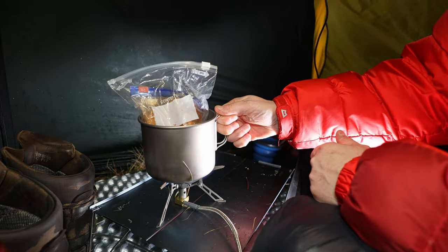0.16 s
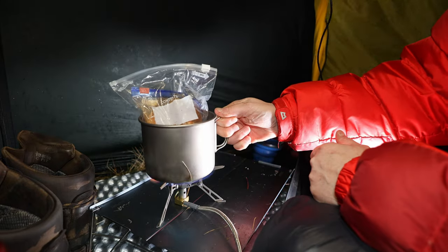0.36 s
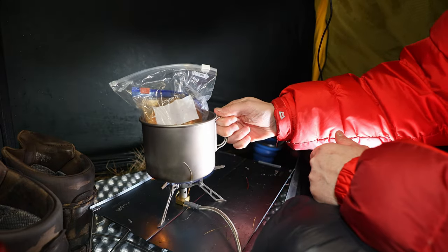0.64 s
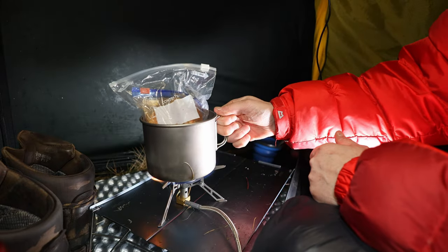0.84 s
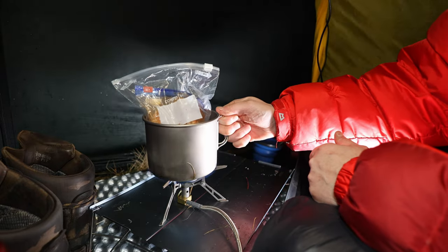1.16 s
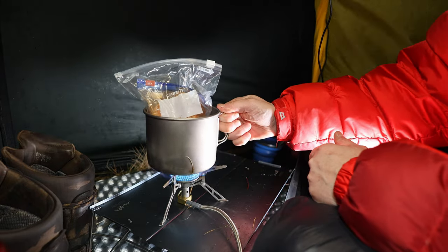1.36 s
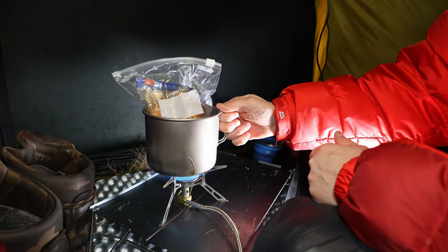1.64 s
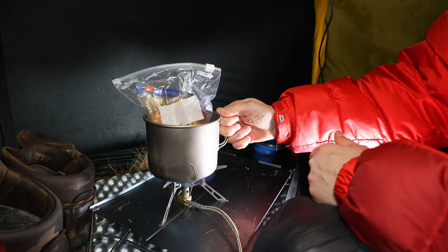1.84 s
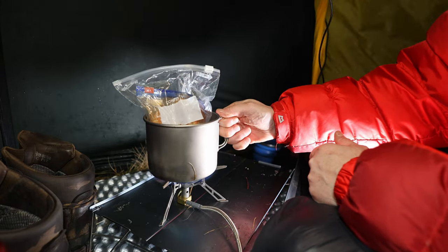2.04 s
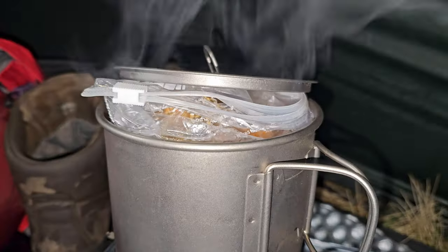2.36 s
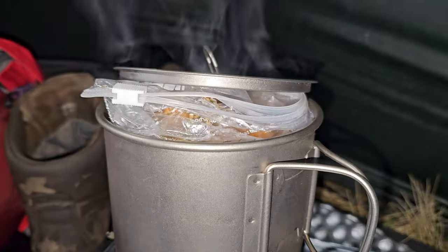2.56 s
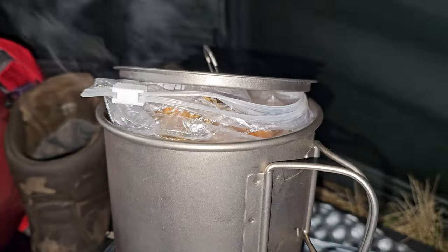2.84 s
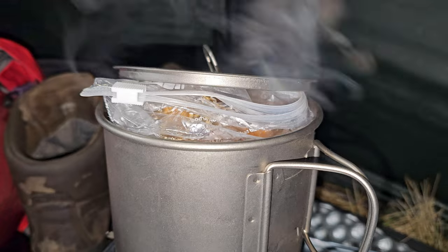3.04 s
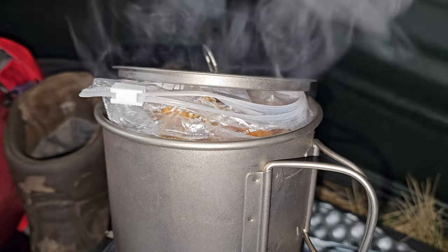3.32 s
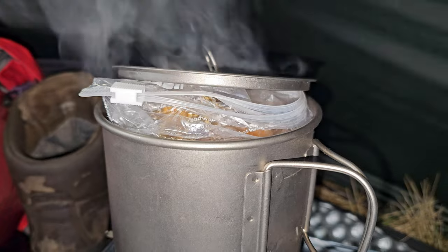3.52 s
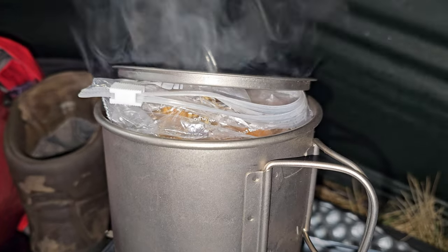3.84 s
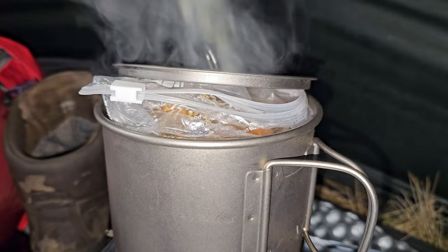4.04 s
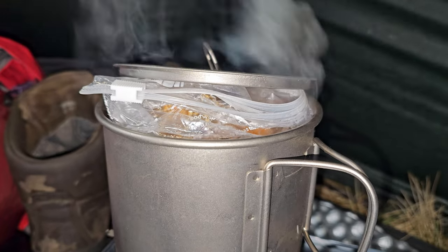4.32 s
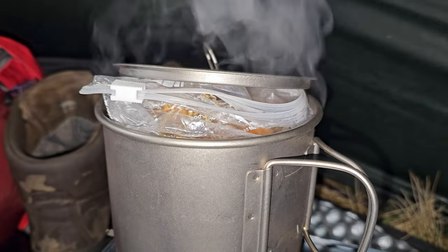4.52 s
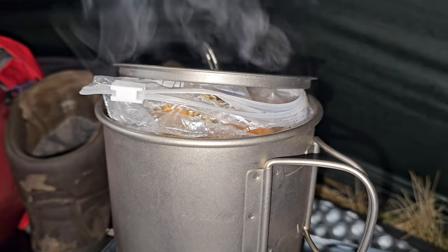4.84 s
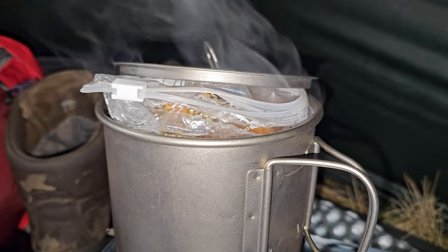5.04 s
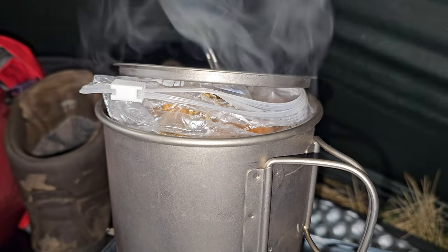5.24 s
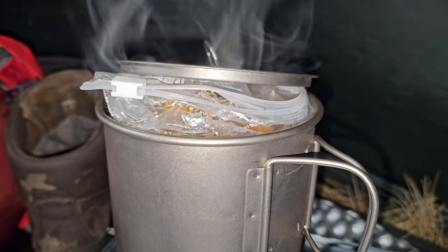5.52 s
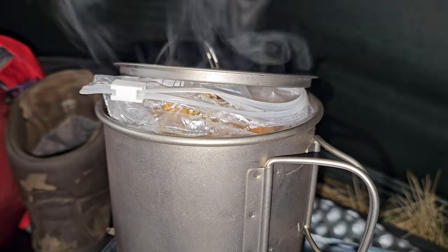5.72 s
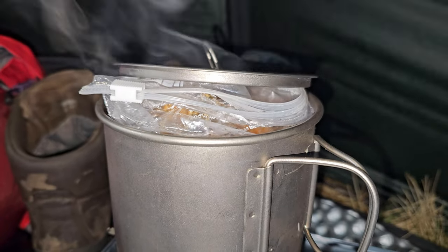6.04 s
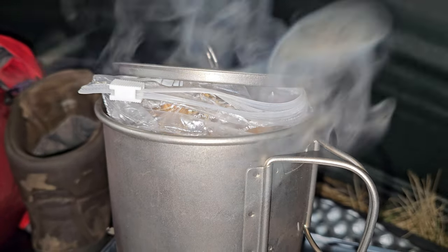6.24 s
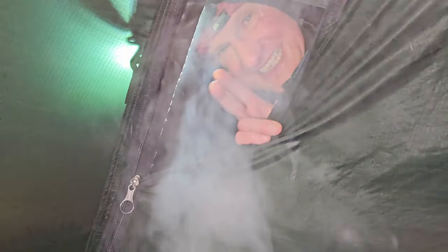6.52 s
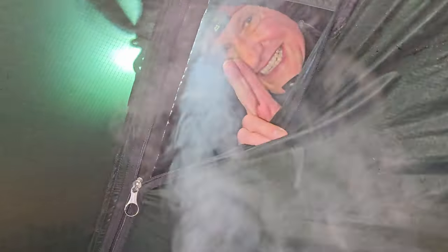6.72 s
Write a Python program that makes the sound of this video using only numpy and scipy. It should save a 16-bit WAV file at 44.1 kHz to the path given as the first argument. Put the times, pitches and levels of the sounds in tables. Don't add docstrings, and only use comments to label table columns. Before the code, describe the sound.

Inside a tent, a small gas burner hisses close and mono, with sleeve rustles, a dull arm brush and two sharp crackles. Around two seconds the sound cross-fades to a wide stereo view: heavy low wind billows, cloth flaps and cracks, walls slam taut, the lid tinkles and droplets ping over a fainter hiss. After a tiny dropout, a final gusty stretch follows with a dull knock.

```python
import sys
import numpy as np
from scipy import signal
from scipy.fft import rfft, irfft, next_fast_len
from scipy.io import wavfile
from scipy.ndimage import uniform_filter1d, map_coordinates

SR = 44100
rng = np.random.default_rng(int(sys.argv[2]) if len(sys.argv) > 2 else 0)


def decibels_to_gain(level_db):
    exponent = np.asarray(level_db, float) / 20
    return 10 ** exponent


def wav_out(sig):
    wavfile.write(sys.argv[1], SR, np.round(np.clip(np.atleast_2d(sig).T, -1, 1) * 32767).astype(np.int16))


N = 303393

FADE_START, FADE_END = 1.944, 2.73
DROPOUT_START, DROPOUT_END = 6.358, 6.3915

# (frequency [Hz], density [dB per Hz])
WIND_TONE_NEAR = [(12, -38), (20, 1), (80, -2.5), (108, -1), (159, -2.5), (251, -2.5), (738, -19.5),
                  (1300, -25.5), (2180, -12.5), (2480, -19), (3500, -41), (4550, -52), (7700, -120)]
WIND_TONE_FAR = [(12, -36), (20, -10), (49, 2), (91, -0.5), (386, -20.5), (841, -20), (1020, -25.5),
                 (1680, -26), (2480, -41), (3500, -42.5), (4550, -52), (7700, -120)]
# (time [s], strength [dB])
WIND_NEAR = [(0, -49), (0.6, -40.5), (1.3, -38), (1.9, -36.5), (2.7, -32.5)]
WIND_FAR = [(2.0, -33), (2.6, -27.5), (2.9, -28.5), (3.3, -28), (3.8, -29), (4.5, -34.5), (5.3, -31),
            (5.8, -28), (6.35, -29.5), (6.42, -36), (6.65, -27), (6.88, -32)]
# (peak time [s], peak level [dB], time to fall 10 dB [s])
BILLOWS = [(2.238, -27.5, 0.152), (2.408, -22.6, 0.112), (2.681, -15.8, 0.099), (2.765, -15.5, 0.082),
           (2.889, -15.5, 0.155), (3.145, -20.7, 0.108), (3.402, -22.3, 0.053), (3.485, -17.1, 0.036),
           (3.611, -20.8, 0.123), (3.989, -23.5, 0.121), (4.322, -21.9, 0.073), (4.54, -30.9, 0.049),
           (4.695, -25.3, 0.115), (4.955, -26.4, 0.06), (5.086, -22.3, 0.038), (5.204, -25.1, 0.137),
           (5.437, -22.1, 0.149), (5.506, -21.0, 0.061), (5.616, -13.5, 0.032), (5.688, -16.1, 0.044),
           (5.814, -15.8, 0.18), (6.024, -24.4, 0.09), (6.283, -25.8, 0.044), (6.622, -21.7, 0.119),
           (6.818, -25.8, 0.037)]
# (peak time [s], peak level [dB], time to fall 10 dB [s])
FLAPS = [(1.287, -30.0, 0.052), (1.581, -27.6, 0.043), (1.972, -23.5, 0.035), (2.408, -31.0, 0.126),
         (2.693, -19.1, 0.119), (2.745, -23.3, 0.009), (2.856, -21.7, 0.092), (2.926, -21, 0.07),
         (3.0, -22.5, 0.06), (3.12, -21.5, 0.054), (3.155, -24, 0.03), (3.195, -24.6, 0.008),
         (3.439, -25.1, 0.176), (3.533, -28.1, 0.054), (3.586, -29.6, 0.047), (3.955, -23.5, 0.04),
         (4.312, -32.7, 0.159), (4.584, -30.9, 0.054), (4.66, -32.6, 0.085), (4.988, -27.4, 0.074),
         (5.079, -27.5, 0.056), (5.137, -27.8, 0.066), (5.37, -28.4, 0.022), (5.49, -27.0, 0.124),
         (5.605, -18.5, 0.072), (5.684, -18.7, 0.1), (5.755, -23, 0.06), (5.809, -19, 0.101),
         (5.86, -23, 0.05), (5.895, -20.7, 0.06), (5.94, -24, 0.03), (6.005, -25.2, 0.056),
         (6.186, -36.8, 0.05), (6.618, -35.6, 0.057)]
# (time [s], peak level [dB], pitch [Hz])
SLAMS = [
    (2.659, -15, 66),
    (3.394, -9, 69.6),
    (3.481, -5, 87),
    (5.606, -4, 74.4),
]
# (time [s], peak level [dB], top frequency [Hz], left-right difference [dB])
WHIPS = [(1.964, -20, 4000, -1), (1.977, -17, 5500, -1), (2.018, -22, 3600, -2), (2.707, -19.5, 4500, -7),
         (2.798, -27, 3200, 2), (2.864, -25, 2500, 0), (2.998, -21, 2000, 0), (3.048, -23, 2300, 2),
         (3.196, -24.5, 2400, 0), (3.3011, -24, 1800, 4), (3.4544, -27, 2600, 0), (3.479, -16, 4170, -1),
         (3.6864, -27, 2600, 2.5), (3.9499, -24, 3300, 0), (4.001, -26, 2500, 3), (5.5915, -21, 3500, 1),
         (5.609, -19, 3800, 3.5), (5.6902, -18, 7000, -7), (5.7861, -22, 2600, 3.5),
         (5.815, -16.5, 4000, 2.5), (5.9121, -21, 9000, 2), (5.939, -21, 3600, 0), (6.0198, -23, 8000, -2)]

# (frequency [Hz], ratio [dB])
SPREAD = [(25, -32), (100, -34), (250, -13.5), (640, -3.5), (1400, -13.5), (3000, 0.5), (7000, -4),
          (15000, -0.5)]
# (frequency [Hz], level difference [dB])
TILT = [(60, 0.5), (110, 0.64), (200, 2.2), (380, 2.7), (700, 2.4), (1290, 5), (2380, 2.8), (4400, 0.28),
        (8120, 7), (15000, 1.8)]
# (frequency [Hz], phase lead [rad])
LEAD = [(20, -0.5), (100, 0.31), (300, -0.93), (860, 0.88), (1550, 2), (3000, 3), (5000, 13), (7240, 20),
        (16000, 23)]

# (time [s], peak level [dB], centre [Hz], left-right difference [dB])
KNOCKS = [(0.5162, -20, 1280, 0), (1.8303, -13.5, 1080, 0), (1.8325, -16, 1250, 0),
          (1.9639, -26, 1230, -0.5), (1.9774, -22, 1038, -1), (2.4249, -19, 1080, 1),
          (2.5895, -15, 1080, 2), (2.6924, -7.5, 930, -5), (2.8629, -15, 1010, -10),
          (2.9991, -28, 1290, -3), (3.048, -23, 1020, 0), (3.1961, -32, 1660, 1), (3.3009, -18, 1300, 8),
          (3.437, -39, 1200, -1), (3.48, -20, 1150, -2), (3.9489, -23, 1190, 5), (3.958, -17, 710, 1),
          (4.9861, -18, 1110, 8), (5.218, -22, 1590, 5), (5.4735, -20, 1160, 3), (5.5907, -26, 1100, 8),
          (5.6077, -13, 1160, 5), (5.6914, -20, 1180, -4), (5.7857, -14, 1170, 0), (5.8114, -16, 1090, 3.5),
          (6.485, -16.5, 470, -2), (6.775, -22.5, 1490, 3)]
# (time [s], peak level [dB], centre [Hz], left-right difference [dB])
TICKS = [(1.5369, -20, 2116, 0), (1.9627, -18, 3030, 0), (1.9759, -17, 4200, -2), (2.0188, -17, 2020, -0.5),
         (2.4648, -21, 2670, -2), (2.6828, -21, 2960, -3), (2.7067, -28, 2080, -7), (3.458, -26, 3660, 0),
         (3.481, -28, 1900, 5), (3.695, -25.5, 2040, 0.5), (3.9544, -32, 2730, 1.5),
         (5.6144, -15.5, 1900, -3), (6.0197, -18.5, 2300, -7), (6.1315, -23.5, 2940, -1)]
# (time [s], peak level [dB], centre [Hz], left-right difference [dB])
BRUSH = [
    (.398, -17.5, 630, 0),
]
# (time [s], peak level [dB], pitch [Hz], length [s])
DRIPS = [(3.187, -29, 14100, .011), (4.186, -33, 1500, .004), (4.194, -33, 1400, .004),
         (4.235, -33, 1350, .004), (4.353, -33, 1500, .004), (4.4576, -33, 1650, .004),
         (4.563, -33, 1400, .004), (4.6202, -36, 2500, .003), (4.697, -35, 2000, .003),
         (4.7634, -36, 2500, .003), (4.782, -35, 1600, .004), (4.8981, -33, 1620, .004),
         (5.0687, -32, 1400, .004), (6.064, -42, 6400, .02), (6.267, -38, 5500, .005),
         (6.329, -42, 3800, .005), (6.709, -33, 1500, .004), (6.765, -35, 1400, .004)]
# (time [s], peak level [dB], level under 4 kHz [dB], left-right
# difference [dB])
RUSTLES = [(0.168, -24.5, 7, 0), (0.2634, -29.5, 5, 0), (1.904, -21.5, 5.5, 0), (2.4655, -33.5, 11.5, -1),
           (2.775, -27, -13, 3.5), (3.025, -33, -9, 2.5), (3.696, -34, 2, 3), (3.7994, -34, -15, 5.5),
           (3.896, -38, -9, 6), (4.1704, -35.5, 6, 7), (4.534, -33, 6.5, 6), (4.949, -35.5, 2, 3.5),
           (4.9933, -35, 7.5, 1), (5.3216, -40, 11, 7), (5.4595, -36, 8, 0), (5.5918, -35, 4, -2),
           (5.689, -31, -3, -7), (5.899, -33, 4, -6), (5.912, -28, 4, -1), (6.21, -30, 5, 1),
           (6.27, -32, 4.5, 4), (6.4006, -28, -3.5, 2.5), (6.4174, -40, -15, 2.5), (6.4344, -35, -14, 3.5),
           (.4256, -29, 12, 0),
    (.441, -33, 12, 0),
]
# (time [s], peak level [dB], left-right difference [dB])
LID_TAPS = [(2.6978, -40, 2), (2.7244, -37, 1), (2.7867, -28.5, 5), (2.8794, -36, -2), (3.054, -36, -3),
            (3.181, -23, 0), (3.5239, -40, 4), (5.673, -33, -5), (5.8072, -23.5, -1.5), (5.9494, -35, 2),
            (6.1504, -35, 9)]
# (frequency [Hz], width [Hz], level [dB])
RIM = [(11500, 270, 0), (11600, 300, -8)]
# (frequency [Hz], width [Hz], level [dB])
DOME = [(10900, 600, -2), (14150, 250, 4), (15150, 350, -2), (12200, 400, -16), (8500, 200, -12)]

# (time [s], burst level [dB], length [s], echo level [dB], echo decay by 60 dB [s])
CRACKLES = [
    (.4474, -19, .0026, -9, .06),
    (.5708, -17.5, .0026, -7, .05),
]
# (time [s], peak level [dB])
SPIKES = [(.4475, -9), (.4479, -4), (.4489, -7), (.4495, -7.5), (.571, -5), (.5713, -7), (.5726, -6),
          (.5729, -6.5)]
# (frequency [Hz], density [dB per Hz])
SPARK_TONE = [(470, -20), (1200, -10), (2200, -10), (3200, -3), (5440, -1.5), (9000, 0), (14500, -1),
              (16000, -20)]

# (frequency [Hz], density [dB per Hz])
HISS_NEAR = [(1200, -42), (2000, -29.5), (3650, -14), (4400, -7), (5700, -13.5), (8000, -10), (9000, -15),
             (10200, -23), (12500, -22), (16000, -19)]
HISS_FAR = [(1200, -36), (2000, 7.5), (3000, -1), (4300, -2.5), (5900, -2.5), (8000, -4.5), (10500, -11),
            (14800, -8), (16000, -9.5)]
HISS_LAST = [(1180, -32), (2000, -4), (3170, -12.5), (3810, -14), (6470, -13), (7770, -5), (11400, -15.5),
             (16000, -9)]
# (frequency [Hz], width [Hz], lift [dB])
HEAD_NEAR = [(1900, 190, -12), (2200, 160, -1.5), (2500, 190, -8), (3240, 180, 6.5), (3630, 170, -9),
             (4280, 570, 8.5), (5300, 280, 5), (5950, 270, 8.5), (6700, 170, 6), (6850, 130, -3),
             (7850, 200, 5), (8450, 200, 2), (10300, 300, -2), (10900, 350, 9)]
HEAD_SHIFTED = [(3200, 200, 1), (3600, 200, -5), (4430, 450, 5), (4470, 160, 4), (5250, 230, 2),
                (5950, 200, 7.5), (6400, 250, 5.5), (6800, 130, 4), (7200, 280, 8.5), (7650, 150, 8),
                (7900, 120, -2), (8180, 180, 6), (10300, 300, 2), (10900, 400, 9.5)]
HEAD_FAR = [(5050, 480, 5.6), (7230, 400, 9.2), (9140, 890, 2), (11800, 510, 5.6)]
# (time [s], share moved [0-1])
POT_SHIFT = [(0, 0), (.8, 0.2), (1, .6), (1.6, 0.7), (1.8, 1), (2.6, 0.7)]
# (time [s], level [dB])
GAS_FLOW = [(0, -1.5), (.4, -0.5), (.65, 0.2), (1.25, 0), (1.6, -2), (1.9, 1.4), (2.3, 0.5)]
# (whistle [dB], hiss [dB], air [dB])
JET_NEAR_DB = (-35, -37, -51.5)
JET_FAR_DB = (-48, -47.5, -54)
JET_LAST_DB = (-51.5, -55, -55)
# (whistle [dB per dB], hiss [dB per dB], air [dB per dB])
STIRRED = (0.2, 0.025, 0.41)

CALM_NEAR_DB, CALM_FAR_DB = -40, -30
# (level [dB], growth [dB per dB])
ROAR_NEAR, CLATTER_NEAR = (-32.5, 0.34), (-42, 0.95)
ROAR_FAR, CLATTER_FAR = (-33, 2.1), (-44.5, 0.72)


def unit(x):
    return x / np.sqrt(np.mean(x ** 2) + 1e-20)


def along(points, hz):
    f, v = np.transpose(points)
    return np.interp(np.log(hz + 1), np.log(f + 1), v)


def curve(rows):
    s, values = np.transpose(rows)
    return np.interp(np.arange(N) / SR, s, values)


def wobble(rate):
    knots = rng.standard_normal(int(N * rate / SR) + 4)
    return map_coordinates(knots, [np.arange(N) * rate / SR])


def filtered(x, response):
    n = x.shape[-1]
    m = next_fast_len(n + 4096)
    return irfft(rfft(x, m) * response(np.fft.rfftfreq(m, 1 / SR)), m)[..., :n]


def band(hz, lo_hz, hi_hz):
    return 1 / np.sqrt((1 + (lo_hz / (hz + 1)) ** 8) * (1 + (hz / hi_hz) ** 8))


def lift(modes, hz):
    return decibels_to_gain(sum(db * np.exp(-2 * ((hz - c) / w) ** 2) for c, w, db in modes))


def patches(shape, bins, frames):
    smooth = uniform_filter1d(rng.standard_normal(shape), size=bins, axis=0)
    return unit(uniform_filter1d(smooth, size=frames, axis=1))


def rush(colour, patchy_db, stereo, banded_db=0):
    z = signal.stft(rng.standard_normal((2, N)), nperseg=512)[2]
    eddies = patches(z.shape[1:], 6, 8)
    bands = patches(z.shape[1:], 3, 70)
    pair = signal.istft(z * decibels_to_gain(patchy_db * eddies + banded_db * bands), nperseg=512)[1][:, :N]

    def shared_and_apart(hz):
        turn = stereo * np.arctan(decibels_to_gain(along(SPREAD, hz)))
        return colour(hz) * np.array([np.cos(turn), np.sin(turn)])

    half = np.array([[.5], [-.5]]) * stereo

    def ear_offset(hz):
        return decibels_to_gain(half * along(TILT, hz)) * np.exp(1j * half * along(LEAD, hz))

    mid, side = filtered(pair, shared_and_apart)
    ears = filtered(np.array([mid + side, mid - side]), ear_offset)
    return ears / np.sqrt(np.mean(ears.mean(axis=0) ** 2))


def view_shares():
    far = np.clip((np.arange(N) / SR - FADE_START) / (FADE_END - FADE_START), 0, 1)
    return 1 - far, far


def add(track, s, sound, pan_db):
    spot = track[:, round(s * SR):][:, :sound.shape[-1]]
    spot += (sound * decibels_to_gain([[pan_db / 2], [-pan_db / 2]]))[:, :spot.shape[1]]


def puff(s, t60, colour, attack):
    t = np.arange(SR // 6) / SR
    noise = rng.standard_normal((2, len(t)))
    if s <= (FADE_START + FADE_END) / 2:
        noise = noise[[0, 0]]
    burst = filtered(noise, colour) * decibels_to_gain(-60 * t / max(t60, .005)) * (1 - np.exp(-t / attack))
    return burst / np.abs(burst.mean(axis=0)).max()


def swells(rows, rise):
    t = np.arange(0, N + 64, 64) / SR
    s, db, fall_s = np.transpose(rows)
    after = (t[:, None] - s) / fall_s
    power = decibels_to_gain(db - 10 * np.maximum(after, -after / rise)) ** 2
    return np.interp(np.arange(N) / SR, t, np.sum(power, axis=1))


def gusts():
    booms = decibels_to_gain(2 * 0.2) * swells(BILLOWS, rise=1)
    flaps = decibels_to_gain(2 * 1.75) * swells(FLAPS, rise=.28)
    events = [booms, flaps, flaps * decibels_to_gain(-10.5) ** 2]
    views = [(WIND_NEAR, CALM_NEAR_DB, ROAR_NEAR, CLATTER_NEAR),
             (WIND_FAR, CALM_FAR_DB, ROAR_FAR, CLATTER_FAR)]
    gains = []
    for strength, calm_db, roar, clatter in views:
        above_calm = curve(strength) - calm_db
        layers = zip([(calm_db, 1), roar, clatter], events)
        gains.append([np.sqrt(decibels_to_gain(db + grows * above_calm) ** 2 + power) for (db, grows), power in layers])
    return gains


def evened(x, span, depth):
    power = uniform_filter1d(x.mean(axis=0) ** 2, size=round(span * SR))
    return x / (np.abs(power) + 0.012) ** (np.clip(depth, 0, 1) / 2)


def wind():
    near, far = view_shares()
    lumps = 0.83 * wobble(24) + 0.88 * wobble(70)
    out = 0
    # (low [Hz], near top [Hz], far top [Hz], lumps [dB], patches [dB], evenness [0-1])
    layers = [(20, 128, 146, 0.45, 0.7, 0.59),
              (144.6, 490, 515, 0.92, 2.06, 0.6),
              (532, 1230, 5500, 1.66, 1.84, 1.0)]
    for near_gain, far_gain, layer in zip(*gusts(), layers):
        lo_hz, near_hz, far_hz, lump_db, patchy_db, depth = layer
        close = rush(lambda hz: decibels_to_gain(along(WIND_TONE_NEAR, hz)) * band(hz, lo_hz, near_hz), patchy_db, stereo=0)
        tent = rush(lambda hz: decibels_to_gain(along(WIND_TONE_FAR, hz)) * band(hz, lo_hz, far_hz), patchy_db, stereo=0.91)
        out = out + near * near_gain * evened(close, 0.04, depth) * decibels_to_gain(1.23 * lump_db * lumps)
        out = out + far * far_gain * evened(tent, 0.071, depth) * decibels_to_gain(lump_db * lumps)
    return out


def slams():
    out = np.zeros((2, N))
    for s, db, pitch_hz in SLAMS:
        u = np.arange(round(1.3 * SR / pitch_hz)) * pitch_hz / SR
        add(out, s, -decibels_to_gain(db) * np.sin(2 * np.pi * u) * np.sin(np.pi * u / 1.3), .6)
    return out


def snaps():
    strike = rng.random(N) < 110 / SR
    size = decibels_to_gain(4 * np.minimum(rng.exponential(size=N), 2)) * strike
    decay = decibels_to_gain(-60 * np.arange(SR // 50) / SR / 0.012)
    noise = [[1, 0.57], [1, -0.56]] @ rng.standard_normal((2, N))
    grains = signal.fftconvolve(size, decay)[:N] * noise
    grains = unit(filtered(grains, lambda hz: band(hz, 280, 1700) + decibels_to_gain(-24) * band(hz, 1500, 4500)))
    far_clatter = gusts()[1][2]
    return view_shares()[1] * far_clatter * decibels_to_gain(-9 + np.array([[1.5], [-1.5]])) * grains


def whips():
    out = np.zeros((2, N))
    for s, db, top_hz, pan_db in WHIPS:
        colour = lambda hz: band(hz, 350, top_hz) * (500 / (hz + 500)) ** 1.5
        crack = puff(0, .03, colour, attack=.0004)
        add(out, s, decibels_to_gain(db) * crack, pan_db)
    return out


def knocks():
    out, t = np.zeros((2, N)), np.arange(SR // 6) / SR
    for rows, t60 in [(KNOCKS, .024), (TICKS, .022), (BRUSH, .35)]:
        for s, db, centre_hz, pan_db in rows:
            colour = lambda hz: band(hz, .75 * centre_hz, 1.5 * centre_hz)
            ring = np.sin(2 * np.pi * centre_hz * t) * decibels_to_gain(-60 * t / min(t60, .05)) * (1 - np.exp(-t * 2500))
            blow = 0.76 * puff(s, t60, colour, attack=0.00035) + ring
            add(out, s, decibels_to_gain(db - 8.5) * blow, pan_db)
    return out


def drips():
    out = np.zeros((2, N))
    for s, db, pitch_hz, length in DRIPS:
        t = np.arange(round(length * SR)) / SR
        ping = np.sin(2 * np.pi * pitch_hz * t * (1 + .01 * t / length))
        add(out, s, decibels_to_gain(db) * np.sin(np.pi * t / length) * ping, 3)
    return out


def rustles():
    out, t60 = np.zeros((2, N)), 0.09
    for s, db, low_db, pan_db in RUSTLES:
        edge_hz = 4500 if low_db > -5 else 9500
        bright = puff(s, t60, lambda hz: band(hz, edge_hz, 17000), attack=.004)
        lower = puff(s, t60, lambda hz: band(hz, 1060, 4100), attack=0.0012)
        add(out, s, decibels_to_gain(db - 5.0) * (bright + decibels_to_gain(low_db) * lower), pan_db)
    return out


def lid():
    out = np.zeros((2, N))
    for s, db, pan_db in LID_TAPS:
        modes = DOME if db > -27 else RIM

        def colour(hz):
            return np.sqrt(sum(decibels_to_gain(level) ** 2 / (1 + (2 * (hz - c) / w) ** 2) for c, w, level in modes))

        add(out, s, decibels_to_gain(db - 1.0) * puff(s, 0.055, colour, attack=0.0007), pan_db)
    return out


def crackles():
    out, t = np.zeros((2, N)), np.arange(SR // 16) / SR
    spark = lambda hz: decibels_to_gain(along(SPARK_TONE, hz))
    for s, db, length, echo_db, t60 in CRACKLES:
        noise = unit(filtered(rng.standard_normal(len(t)), spark))
        add(out, s, decibels_to_gain(db) * noise * np.where(t < length, 1, decibels_to_gain(echo_db - 60 * t / t60)), 0)
    click = 1. * (np.arange(64) == 32)
    snap = np.gradient(filtered(click, lambda hz: spark(hz) / (hz + 500)))
    for s, db in SPIKES:
        add(out, s - 32 / SR, decibels_to_gain(db) * snap / np.abs(snap).max(), 0)
    return out


def jet():
    near, far = view_shares()
    last = np.arange(N) / SR > DROPOUT_START
    shift = np.clip(curve(POT_SHIFT), 0, 1)
    flow_db = curve(GAS_FLOW)
    flutter = wobble(14) + 1.23 * wobble(45)
    stir = gusts()[1][2] / decibels_to_gain(CLATTER_FAR[0])
    edge = rush(lambda hz: lift(HEAD_NEAR, hz) * band(hz, 1730, 2620), patchy_db=2.0, stereo=0)
    out = near * decibels_to_gain(-45.5) * edge
    bands_hz = [(2600, 5500), (5700, 9750), (9600, 23000)]
    layers = zip(JET_NEAR_DB, JET_FAR_DB, JET_LAST_DB, STIRRED, bands_hz)
    for near_db, far_db, last_db, stirred, (lo_hz, hi_hz) in layers:

        def hiss(tone, modes, patchy_db, stereo):
            colour = lambda hz: decibels_to_gain(along(tone, hz)) * lift(modes, hz) * band(hz, lo_hz, hi_hz)
            return rush(colour, patchy_db, stereo, banded_db=.6 + .2 * stereo)

        before = hiss(HISS_NEAR, HEAD_NEAR, 2.1, stereo=0)
        moved = unit(filtered(before, lambda hz: lift(HEAD_SHIFTED, hz) / lift(HEAD_NEAR, hz)))
        close = decibels_to_gain(near_db + flow_db + .5 * flutter) * ((1 - shift) * before + shift * moved)
        last_hiss = hiss(HISS_LAST, [], 1.9, stereo=0.97)
        far_hiss = hiss(HISS_FAR, HEAD_FAR, 1.83, stereo=0.98)
        away = np.where(last, last_hiss, far_hiss)
        away_gain = stir ** stirred * decibels_to_gain(np.where(last, last_db, far_db) + 0.47 * flutter)
        out = out + near * close + far * away_gain * away
    return out


def scene():
    tent = wind() + slams() + snaps() + whips()
    handling = knocks() + drips() + rustles() + lid()
    return tent + handling + crackles() + jet()


def top_cut(x):
    return signal.sosfilt(signal.butter(12, 16830, fs=SR, output="sos"), x)


def record(dry):
    t = np.arange(N) / SR
    gap = (t > DROPOUT_START) & (t < DROPOUT_END)
    fade_db = -26 - 2000 * (t - DROPOUT_START) * gap
    mix = np.where(gap, decibels_to_gain(fade_db), 1) * dry
    mix = filtered(mix, lambda hz: hz < 15740)
    mix = mix / (1 + np.abs(mix / .99) ** 8) ** (1 / 8)
    return top_cut(mix)


dry = scene()
out = record(dry)
wav_out(out)
```